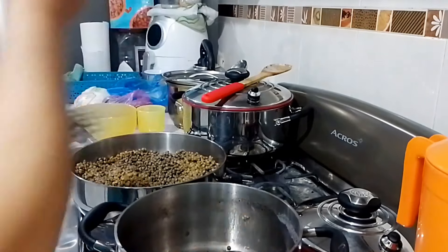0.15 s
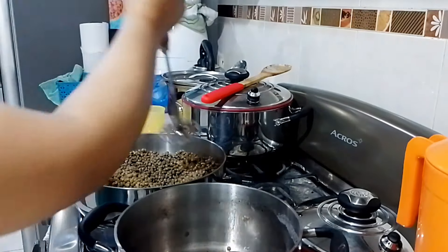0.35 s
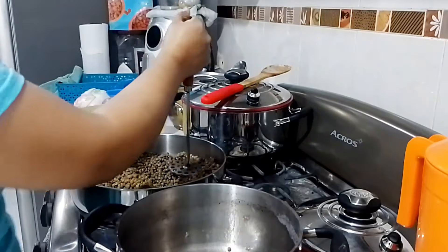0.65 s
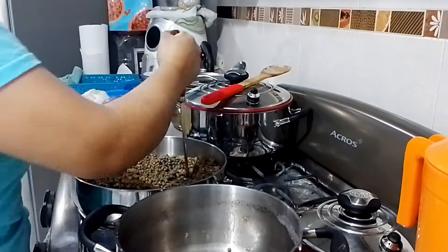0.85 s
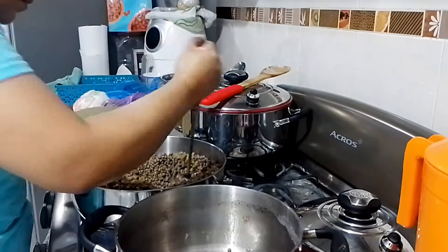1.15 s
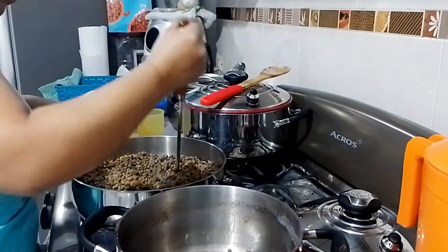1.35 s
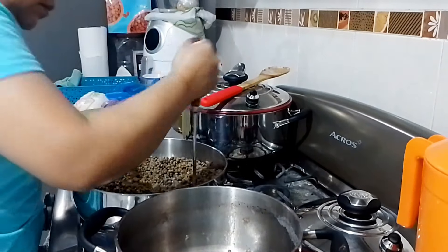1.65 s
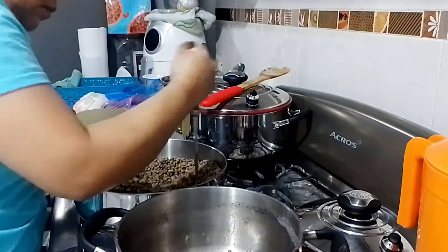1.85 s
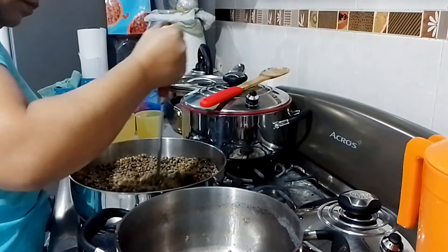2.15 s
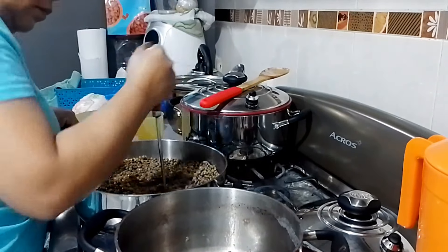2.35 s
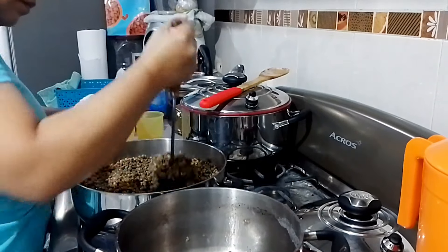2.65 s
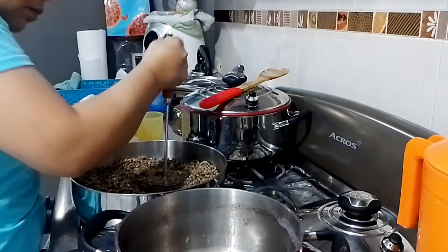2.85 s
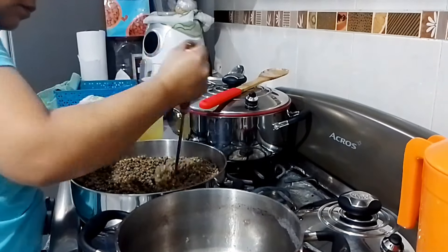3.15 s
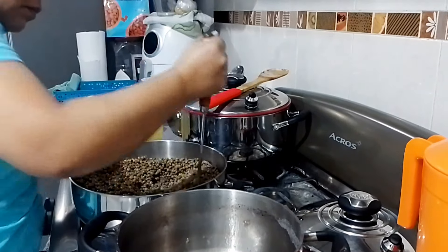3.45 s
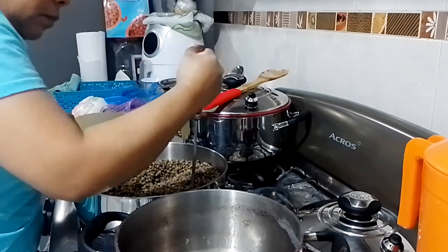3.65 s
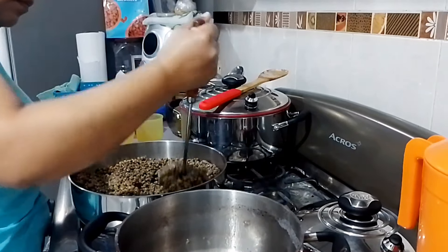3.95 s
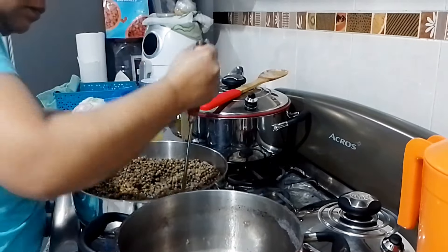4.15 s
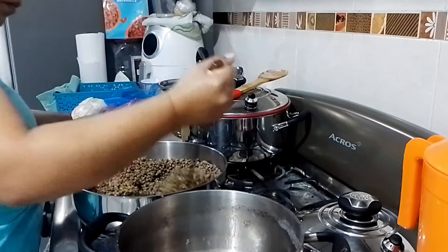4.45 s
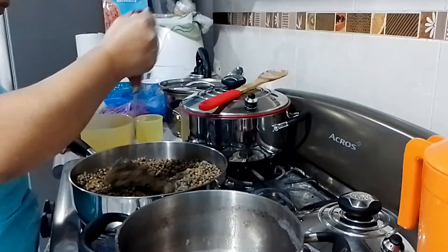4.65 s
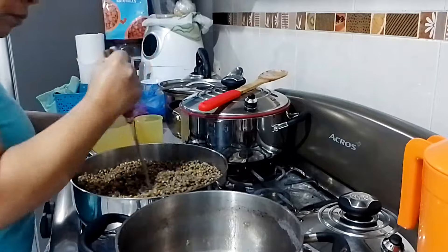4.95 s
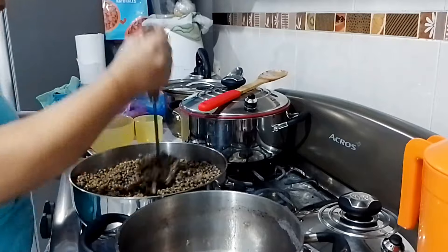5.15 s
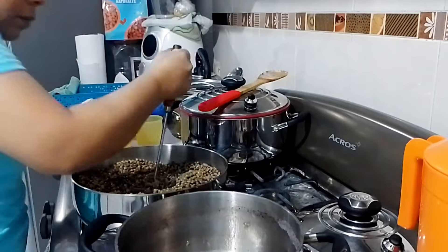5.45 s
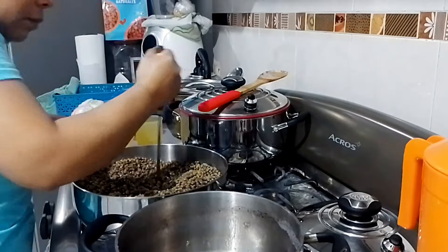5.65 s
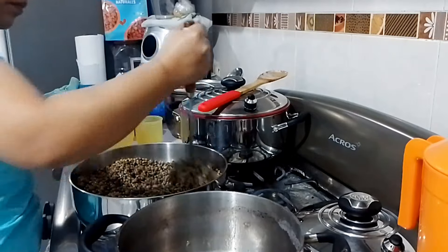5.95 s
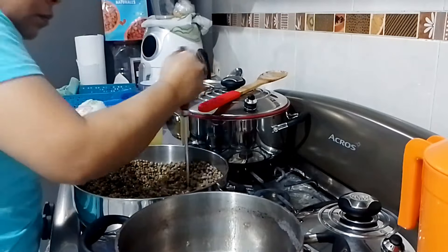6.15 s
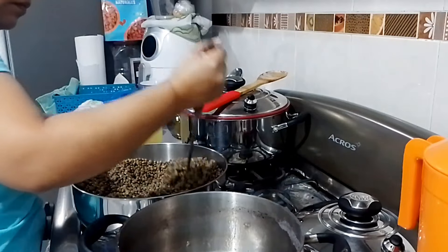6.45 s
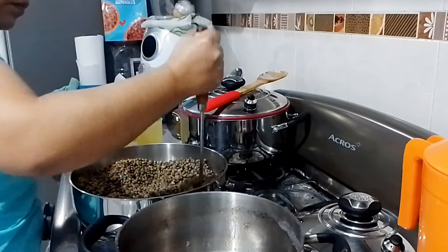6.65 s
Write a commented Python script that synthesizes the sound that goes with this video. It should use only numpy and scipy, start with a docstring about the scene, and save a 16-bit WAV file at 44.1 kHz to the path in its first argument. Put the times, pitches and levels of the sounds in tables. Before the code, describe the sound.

Wet presses, short scrapes and loose steel clacks in a heavy pan of mash, with dull knocks and one last ringing rim blow in a small kitchen.

```python
"""Cooked lentils are mashed in a steel pan on a gas stove, in a small tiled kitchen.
After a moment of silence a faint hiss and wet crackle start; presses fizz (random pops) and paste slurps
(noise-fluttered falling tones). Then the loose steel head clacks (noise bursts and modes), the masher drags
over the pan floor (limited noise and random slips) and knocks the pan (decaying modes, a stove thump).
A last blow clangs on the rim (bright noise and long modes)."""
import sys
import numpy as np
from scipy import signal
from scipy.fft import rfft, irfft, next_fast_len
from scipy.io import wavfile
from scipy.ndimage import map_coordinates

SR = 44100
rng = np.random.default_rng(int(sys.argv[2]) if len(sys.argv) > 2 else 0)


def unload_wav(signal):
    """Save mono or channel-first audio to the path in sys.argv[1] as 16-bit WAV at rate SR, clipped to [-1, 1]."""
    wavfile.write(
        sys.argv[1],
        SR,
        np.round(np.clip(np.atleast_2d(signal).T, -1, 1) * 32767).astype(np.int16),
    )


N = 299439
TIME_S = np.arange(N) / SR
AGE_S = np.arange(SR) / SR  # time since a blow


def amp(db):
    """Decibels to gain."""
    return 10 ** (np.asarray(db) / 20)


def unit(x):
    """Scale to rms 1."""
    return x / np.sqrt(np.mean(x ** 2) + 1e-20)


def along(points, hz):
    """Read (Hz, value) points on a log axis."""
    point_hz, value = np.transpose(points)
    return np.interp(np.log(hz + 1), np.log(point_hz + 1), value)


def filtered(x, response):
    """x times a response of frequency."""
    size = next_fast_len(len(x) + 8192)
    spectrum = rfft(x, size) * response(np.fft.rfftfreq(size, 1 / SR))
    return irfft(spectrum, size)[:len(x)]


def coloured(x, spectrum):
    """x with the given spectrum, at rms 1."""
    return unit(filtered(x, lambda hz: amp(along(spectrum, hz))))


def tilted(rows, tilt_db_per_octave, pivot_hz):
    """Turn the dB column of (Hz, dB, ..) rows about a pivot."""
    return [(hz, db + tilt_db_per_octave * np.log2(hz / pivot_hz), *rest) for hz, db, *rest in rows]


def resonate(x, peaks):
    """Lift (Hz, width Hz, dB) resonances out of x."""
    def response(f):
        total = 1
        for centre, width, db in peaks:
            band = 1j * f * width
            total = total + amp(db) * band / (centre * centre - f * f + band)
        return total
    return filtered(x, response)


def add(track, start_s, sound):
    """Mix a sound in at its start time."""
    part = track[round(start_s * SR):][:len(sound)]
    part += sound[:len(part)]


def burst(spectrum, t60_s, crack_db):
    """Crowded modes dying together under a brief initial crack; rms 1 over the first 20 ms."""
    fade = amp(-60 * AGE_S / t60_s) + amp(crack_db - 60 * AGE_S / 0.017)
    attack = 1 - np.exp(-AGE_S / 0.0019)
    x = coloured(rng.standard_normal(SR), spectrum) * fade * attack
    return x / np.std(x[:SR // 50])


def ring(modes, scatter_db):
    """Clear modes; each blow lands elsewhere and excites them at new strengths."""
    hz, db, t60_s = np.transpose(modes)[:, :, None]
    t = AGE_S[:SR // 2]
    gain = amp(db + scatter_db * rng.standard_normal(hz.shape))
    decay = np.exp(-np.log(1000) * t / t60_s)
    waves = gain * decay * np.sin(2 * np.pi * (hz * t + rng.random(hz.shape)))
    total = waves.sum(0) / np.linalg.norm(gain) * (1 - np.exp(-t / 0.00047))
    return np.pad(total, (0, SR - len(t)))


def grains(rate_per_s, spread_db, spectrum):
    """Tiny random slips or pops of uneven size."""
    hits = rng.random(N) < rate_per_s / SR
    pops = hits * rng.standard_normal(N) * amp(spread_db * rng.standard_normal(N))
    return coloured(pops, spectrum)


def stroke(start_s, length_s, attack_s, release_s):
    """Gain of one push of the hand: it builds, holds for its length and lets go."""
    age = np.maximum(TIME_S - start_s, 0)
    return (1 - np.exp(-age / attack_s)) ** 2 * np.exp(-np.maximum(age - length_s, 0) / release_s)


def wobble(points_per_s):
    """A smooth curve through random points."""
    points = rng.standard_normal(int(N * points_per_s / SR) + 4)
    return map_coordinates(points, [TIME_S * points_per_s])


# Colour of the background hiss. Each row: frequency in Hz, density in dB per Hz (relative).
HISS_COLOUR = [(15, -51), (25, 4.5), (43, -19), (130, -10.5), (161, -29), (269, 0.5), (352, -6), (437, -4),
               (620, -7), (905, -1.5), (1040, -6), (1510, -8.5), (9210, -12.5), (15800, -19)]


def hiss():
    """Faint steady noise of fixed colour."""
    return amp(-70.5) * coloured(rng.standard_normal(N), HISS_COLOUR)


# Decay of the tiled room. Each row: frequency in Hz, t60 in s.
ROOM_DECAY = [(100, 0.73), (300, 0.76), (1000, 0.47), (4000, 0.43), (9000, 0.48), (15000, 0.47)]


def kitchen(x, wet_db):
    """Pots and the splashback echo within milliseconds; the tiled room rings on, its decay set by frequency."""
    hz, t, z = signal.stft(rng.standard_normal(SR), SR, nperseg=256)
    decay = amp(-60 * t / along(ROOM_DECAY, hz)[:, None])
    tail = signal.istft(z * decay, SR, nperseg=256)[1][:SR]
    tail = tail * (1 - np.exp(-AGE_S / 0.004))
    tail = tail / np.linalg.norm(tail)
    tail[rng.integers(SR // 300, SR // 40, size=8)] += .11 * rng.choice([-1, 1], size=8)  # echoes
    return x + amp(wet_db) * signal.fftconvolve(x, tail)[:N]


# Light steel touches and wet pops. Each row: start in seconds, relative level in dB.
TOUCHES = [(1.262, -59), (1.84, -36), (2.0263, -39), (2.453, -49.5), (2.567, -56), (2.586, -50.5),
           (3.5338, -45.5), (4.45, -59), (4.9393, -63), (5.077, -59), (6.14, -54)]
# Colour of a touch. Each row: frequency in Hz, density in dB per Hz (relative).
TOUCH_COLOUR = [(2500, -27), (5500, -18), (7500, -4.5), (8800, 4), (10000, 4.5), (11500, -5.5),
                (16000, -16.5)]


def ticks():
    """Very brief contacts that sound mainly in the treble."""
    out = np.zeros(N)
    for start_s, db in TOUCHES:
        add(out, start_s, amp(db - 9) * burst(TOUCH_COLOUR, t60_s=.06, crack_db=0))
    return out


# Paste squeezed from air pockets. Each row: start in seconds, length in s, start pitch in Hz,
# relative level in dB.
AIR_POCKETS = [(.76, .26, 1406, -75), (1.785, 0.087, 961, -51.5), (1.926, 0.063, 620, -56.5),
               (2.7, .055, 745, -53.5), (2.76, 0.051, 860, -59.5), (5.508, 0.0887, 674, -52.5),
               (5.679, 0.047, 1700, -54.5), (5.719, 0.04, 601, -52.5)]
SLURP_FALL_OCTAVES = .5
FLUTTER_COLOUR = [(10, -1.5), (70, -6.0), (300, -20.5), (1000, -69.0)]  # Hz, relative dB per Hz


def slurps():
    """Each air pocket in the paste resonates at a pitch that sinks as it widens."""
    out = np.zeros(N)
    for start_s, length_s, start_hz, db in AIR_POCKETS:
        progress = np.clip(AGE_S / length_s, 0, 1)
        hz = start_hz * 2 ** (-SLURP_FALL_OCTAVES * progress)
        swell = np.sqrt(2 * np.abs(np.sin(np.pi * progress)))
        flutter = coloured(rng.standard_normal(SR), FLUTTER_COLOUR)
        tone = np.sin(2 * np.pi * np.cumsum(hz) / SR)
        add(out, start_s, amp(db) * swell * flutter * tone)
    return out


# Thin steel of the masher. Each row: centre in Hz, width in Hz, lift in dB.
STEEL_PEAKS = [(2264, 68, 13.5), (2930, 100, 6), (7100, 75, -6), (8520, 55, 11.5), (8840, 120, 5),
               (9410, 700, -7), (10900, 70, 5.5)]


def singing(x):
    """Friction noise coloured by the masher's thin steel."""
    return unit(resonate(x, STEEL_PEAKS))


# The masher sinks into the lentils. Each row: start in seconds, length in s, wet fizz in dB, mush in dB.
PRESS_STROKES = [(0.682, 0.096, -62.5, -62.5), (1.206, 0.044, -74, -72.5), (1.692, 0.12, -68, -78.5),
                 (1.88, 0.087, -63.5, -84), (2.303, 0.032, -69, -67.5), (2.485, 0.066, -73.5, -73),
                 (3.073, 0.11, -56.5, -48.5), (3.544, .12, -75, -66.5), (3.796, 0.053, -63, -68),
                 (4.848, 0.029, -68, -61), (4.898, 0.046, -63.5, -73.5), (5.42, 0.054, -70, -62.5),
                 (6.116, 0.048, -73, -64)]
# Colours of fizz and mush. Each row: frequency in Hz, density in dB per Hz (relative).
FIZZ_COLOUR = [(1500, -25.5), (3000, -10.5), (5500, -9), (7500, -1.5), (8800, -3), (10000, 3), (11200, -8),
               (16000, -20)]
MUSH_COLOUR = [(150, -52.5), (310, 7), (500, 2.5), (850, 5), (1700, 3.5), (2300, -5), (3400, -7.5),
               (7000, -14), (14000, -32)]
PRESS_ATTACK_S, PRESS_RELEASE_S = 0.0085, 0.029
# The wet mash keeps crackling faintly between presses.
SETTLE_DB, SETTLE_WANDER_DB, SETTLE_POINTS_PER_S = -75, 1.5, 5.8


def lentils():
    """Each press bursts wet films between the lentils and squeezes paste past the masher's steel."""
    fizz_gain = amp(SETTLE_DB + SETTLE_WANDER_DB * wobble(SETTLE_POINTS_PER_S))
    mush_gain = np.zeros(N)
    for start_s, length_s, fizz_db, mush_db in PRESS_STROKES:
        push = stroke(start_s, length_s, PRESS_ATTACK_S, PRESS_RELEASE_S)
        fizz_gain += amp(fizz_db) * push
        mush_gain += amp(mush_db) * push
    fizz = singing(grains(4800, 3.6, FIZZ_COLOUR))
    mush = singing(grains(1200, 1, MUSH_COLOUR))
    return fizz_gain * fizz + mush_gain * mush


# The loaded pan on its grate. Each row: mode in Hz, relative level in dB, t60 in s.
PAN_MODES = [(271.4, -2, 0.37), (304, -2, 0.38), (370, -8, 0.54), (445, -15, 0.22), (521, 0.5, 0.43),
             (545.4, -2, 0.16), (693, 0.5, 0.11), (790, 1, 0.21), (890, -1.5, 0.13), (1032, -6, 0.27),
             (1053, -4, 0.079), (1072, 0.5, 0.13), (1144, 1.5, 0.09), (1200, -19, 0.21), (1342, -31, 0.22),
             (1560, -15, 0.196), (1708, 0, 0.07), (1840, -24, 0.28), (2215, -18, 0.19)]
# Colour of the pan's crowded modes. Each row: frequency in Hz, density in dB per Hz (relative).
BODY_COLOUR = [(250, -26), (460, 1.5), (640, -2), (830, 6), (1030, -1), (1250, -2.5), (1500, -7.5),
               (1850, -7.5), (2250, -13), (3500, -22), (6000, -32), (12000, -65)]
PAN_T60_S = .14  # the food damps the crowded modes quickly


def pan_sound(tilt_db_per_octave):
    """A blow on the pan: dense short modes, damped by food, gathered round its clear ones."""
    dense = burst(tilted(BODY_COLOUR, tilt_db_per_octave, pivot_hz=1000), PAN_T60_S, crack_db=-33.0)
    dense = resonate(dense, [(hz, 30, db - 3.0) for hz, db, _ in PAN_MODES])
    clear = ring(tilted(PAN_MODES, tilt_db_per_octave, pivot_hz=1000), scatter_db=8.5)
    return amp(-10.0) * (dense / np.std(dense[:SR // 50]) + .7 * clear)


# The masher drags over the pan floor. Each row: start in seconds, length in s, groan in dB, scrape in dB.
DRAG_STROKES = [(1.79, 0.21, -69, -63.5), (2.432, .24, -54.5, -76.5), (2.71, 0.31, -62.5, -68),
                (3.059, 0.15, -47.5, -72), (3.806, 0.41, -64.5, -67.5), (4.418, 0.27, -65.5, -57.5),
                (5.513, 0.26, -61.5, -57), (6.261, 0.25, -61.5, -55.5), (6.684, 0.11, -64, -54)]
# Colour of the groan's shaking. Each row: frequency in Hz, density in dB per Hz (relative).
JUDDER_COLOUR = [(30, -47), (75, -31), (110, -7), (165, -56.5), (235, -5.5), (270, 5.5), (318, 8.5),
                 (380, -15), (700, -29), (2000, -79)]
# The scrape starts almost at once, the groan builds as the hand bears down.
GROAN_ATTACK_S, SCRAPE_ATTACK_S, DRAG_RELEASE_S = 0.032, 0.0054, 0.05


def drag():
    """Stick and slip on the pan floor makes the pan groan fairly evenly, and scrapes in its body."""
    groan_gain, scrape_gain = np.zeros(N), np.zeros(N)
    for start_s, length_s, groan_db, scrape_db in DRAG_STROKES:
        groan_gain += amp(groan_db) * stroke(start_s, length_s, GROAN_ATTACK_S, DRAG_RELEASE_S)
        scrape_gain += amp(scrape_db) * stroke(start_s, length_s, SCRAPE_ATTACK_S, DRAG_RELEASE_S)
    shake = signal.hilbert(coloured(rng.standard_normal(N), JUDDER_COLOUR), next_fast_len(N))[:N]
    groan = unit(shake.real / np.hypot(np.abs(shake), .6))  # friction caps the swing
    scrape = grains(1400, 1.97, BODY_COLOUR)
    return groan_gain * groan + scrape_gain * scrape


# The loose head clacks. Each row: start in seconds, relative steel level in dB.
HEAD_CLACKS = [(1.3555, -49.5), (2.1165, -49), (2.7062, -52), (3.3501, -36.5), (3.9884, -40.5),
               (4.5932, -43.5), (4.6613, -40), (5.2264, -44), (5.6148, -39), (5.6835, -42.5), (5.7151, -41),
               (5.7598, -42), (5.8362, -48.5), (5.9414, -38.5), (6.4021, -30.5), (6.5811, -36)]
# Colour of the clack. Each row: frequency in Hz, density in dB per Hz (relative).
CLACK_COLOUR = [(1200, -9.5), (2200, 6), (2600, -48), (3300, 8), (3700, 3.5), (4150, 14.5), (4550, -16),
                (5250, 10.5), (5800, -23), (9300, -8), (12000, -38), (16000, -39)]
# The masher's head and shaft. Each row: mode in Hz, relative level in dB, t60 in s.
HEAD_MODES = [(2240, 7.5, 0.22), (3030, 3, 0.17), (3300, 12, 0.16), (3500, -4, 0.16), (3920, 5.5, 0.098),
              (4160, 16.5, 0.042), (5210, 5, 0.32), (5240, -0.5, 0.16), (5480, -5, 0.072)]
REBOUND_S, REBOUND_LOSS_DB = .067, 13.5
# The pan's answer to a typical clack, and its dB per dB of clack.
JOLT_DB, JOLT_GROWTH_DB_PER_DB, TYPICAL_CLACK_DB = -42.5, 0.51, -42


def clacks(count=2):
    """The head chatters across its play, rings, passes the jolt to the pan, and rebounds more weakly."""
    out = np.zeros(N)
    # the contact lasts about a hundredth of a second
    chatter = (1 - np.exp(-AGE_S / 0.00079)) / (1 + (AGE_S / 0.0096) ** 4)
    for start_s, first_db in HEAD_CLACKS:
        for k in range(count):
            db = first_db - k * REBOUND_LOSS_DB
            contact = coloured(rng.standard_normal(SR), CLACK_COLOUR) * chatter
            head = amp(-8) * contact + amp(-9.5) * ring(HEAD_MODES, scatter_db=2)
            jolt_db = JOLT_DB + JOLT_GROWTH_DB_PER_DB * (db - TYPICAL_CLACK_DB)
            jolt = amp(jolt_db) * pan_sound(tilt_db_per_octave=2.0)
            add(out, start_s + k * REBOUND_S, amp(db) * head + jolt)
    return out


# The blow on the rim. Each row: start in seconds, relative level in dB.
RIM_BLOWS = [(6.684, -21)]
# Colour of the clang. Each row: frequency in Hz, density in dB per Hz (relative).
CLANG_COLOUR = [(150, -40), (280, 1.5), (420, -11.5), (1000, 0.5), (1700, 3), (3000, 3), (3950, 8.5),
                (4900, -3), (6400, 6), (8500, 6), (10500, -3.5), (13000, -11.5), (16000, -31.5)]
# The bare rim. Each row: mode in Hz, relative level in dB, t60 in s.
RIM_MODES = [(599, -0.5, 0.21), (930, -11, .4), (1213, -2.5, 0.45), (1734, -5, 0.19), (2180, -5, 0.27),
             (2970, -1, 0.13), (3320, 5, 0.23), (3887, -8, .3), (4200, 16, 0.039), (6300, -4, 0.65),
             (6860, -15, .5), (6820, -27, .5), (7120, 14, 0.16), (7700, 10, 0.14), (7880, -9, 0.22),
             (8600, -6, 0.33)]


def rim():
    """Steel on bare steel, above the food: bright and ringing."""
    out = np.zeros(N)
    for start_s, db in RIM_BLOWS:
        clang = amp(-6) * burst(CLANG_COLOUR, t60_s=0.17, crack_db=7.5)
        ringing = amp(-7) * ring(RIM_MODES, scatter_db=1)
        add(out, start_s, amp(db) * (clang + ringing))
    return out


# The masher knocks the pan. Each row: start in seconds, relative body level in dB, steel contact in dB
# and stove thump in dB (both relative to body), body tilt in dB per octave, top sparkle in dB per octave.
PAN_KNOCKS = [(1.786, -37.5, 3.5, -19, 1, -23), (3.054, -27, -6, -26, 2, -5),
              (3.131, -18.5, 4.5, -28, 3, -1), (3.244, -29, -0.5, -18, 3, -22),
              (4.236, -27, 6, -14, 1.5, 10), (4.256, -29, 1, -6, 7, 7), (4.392, -25.5, 3.5, -8.5, 4.5, -7),
              (4.508, -32.5, -20, -32, 3.5, -2), (4.539, -37, -8, -11, 5, -16),
              (5.499, -35, -11.5, -25, 5.5, 12), (5.757, -32, -14.5, -35, 4, -5),
              (6.343, -21.5, -2, -10.5, 3, -1)]
# Colours of steel contact and stove thump. Each row: frequency in Hz, density in dB per Hz (relative).
CONTACT_COLOUR = [(300, -49), (900, -50), (2300, -6), (2900, 2.5), (3500, -6.5), (3950, 0), (4800, 0),
                  (7000, 2), (9500, 6.5), (10500, -4), (12500, -14), (16000, -35.5)]
THUMP_COLOUR = [(25, -60), (70, -20), (115, -15), (165, -34), (235, -19), (280, 8), (325, -1), (450, 0.5),
                (800, -43)]


def knocks():
    """The masher hits the food-damped pan: its ring, a thump through the stove, a steel crack just after."""
    out = np.zeros(N)
    for start_s, db, steel_db, thump_db, body_tilt, sparkle in PAN_KNOCKS:
        thump = amp(thump_db - 11) * burst(THUMP_COLOUR, t60_s=0.11, crack_db=-8.0)
        # the barer the steel, the more of the top octave it gives
        colour = [(hz, level + sparkle * np.log2(max(hz / 8000, 1))) for hz, level in CONTACT_COLOUR]
        contact = burst(colour, t60_s=.11, crack_db=9)
        add(out, start_s, amp(db) * (pan_sound(body_tilt) + thump))
        add(out, start_s + .0005, amp(db + steel_db - 15.0) * contact)
    return out


def scene():
    """All the work at the pan, in the room, over a faint steady hiss."""
    blows = kitchen(knocks() + rim(), wet_db=-5.5) + kitchen(clacks() + ticks(), wet_db=-4.5)
    # keep the blows free of deep rumble
    blows = signal.sosfilt(signal.butter(2, 85, "high", fs=SR, output="sos"), blows)
    food = kitchen(lentils() + drag() + slurps(), wet_db=-7.5)
    return (blows + food + hiss())[None]


START_S, FADE_IN_S, TOP_HZ = .38, .01, 15850


def record(dry):
    """The microphone opens after a moment of silence and keeps nothing above its band limit."""
    opened = np.clip((TIME_S - START_S) / FADE_IN_S, 0, 1)
    return filtered(dry[0] * opened, lambda hz: hz < TOP_HZ)[None]


dry = scene()
out = record(dry)
unload_wav(out)
```